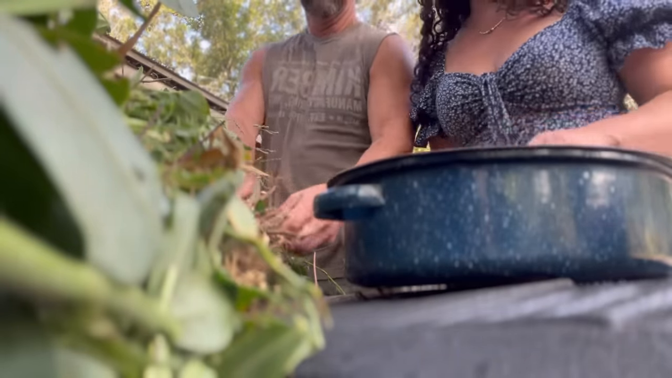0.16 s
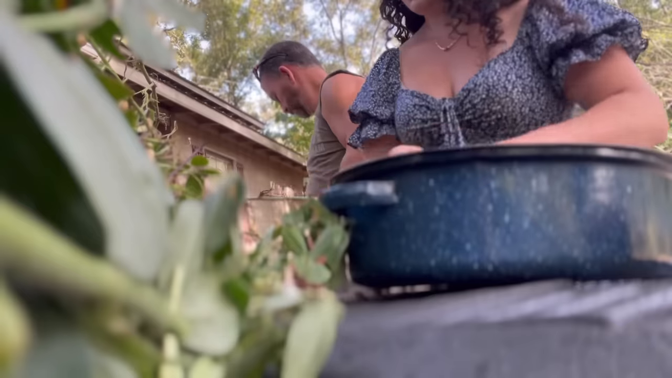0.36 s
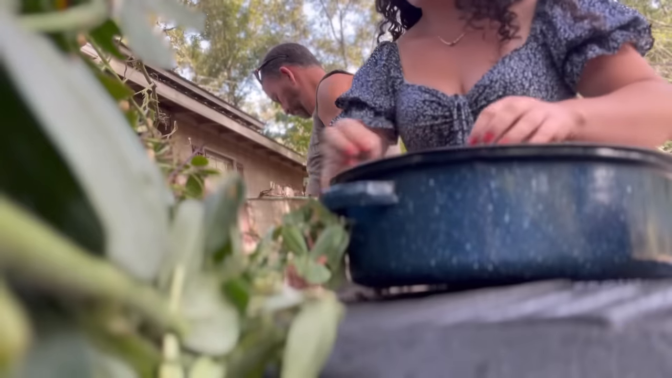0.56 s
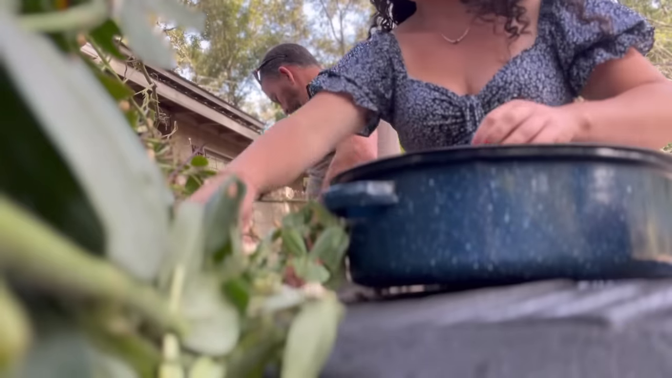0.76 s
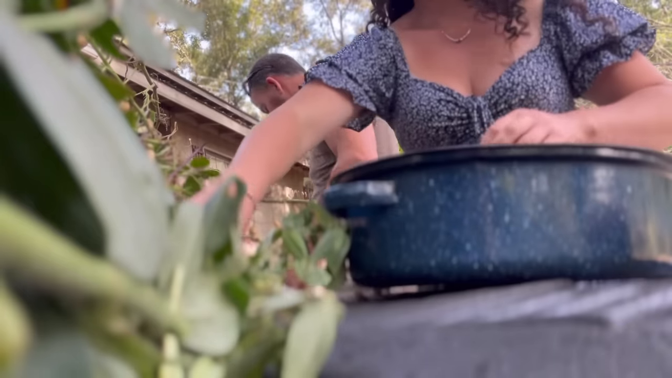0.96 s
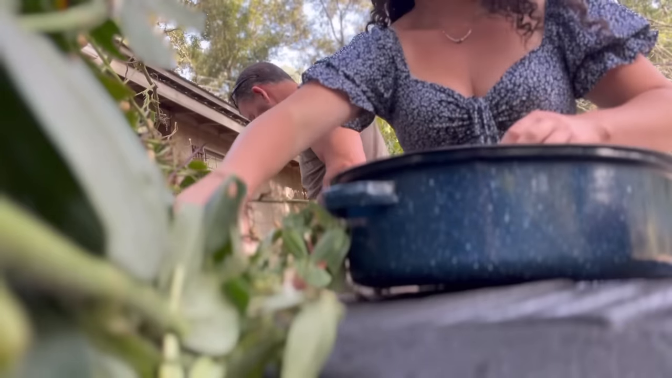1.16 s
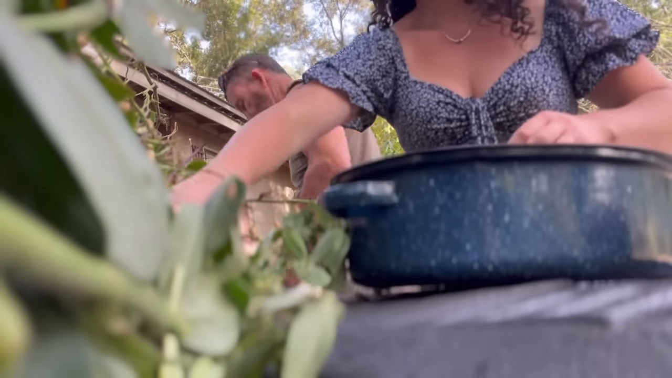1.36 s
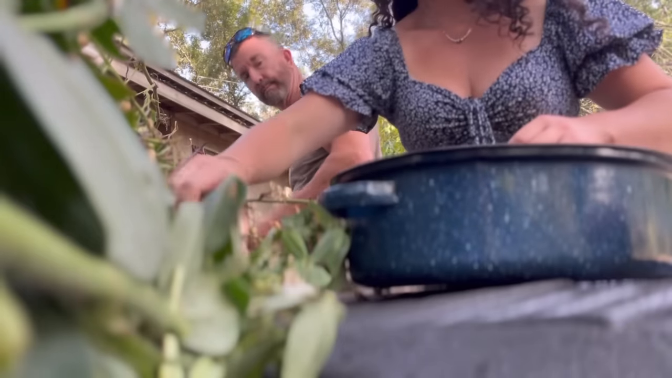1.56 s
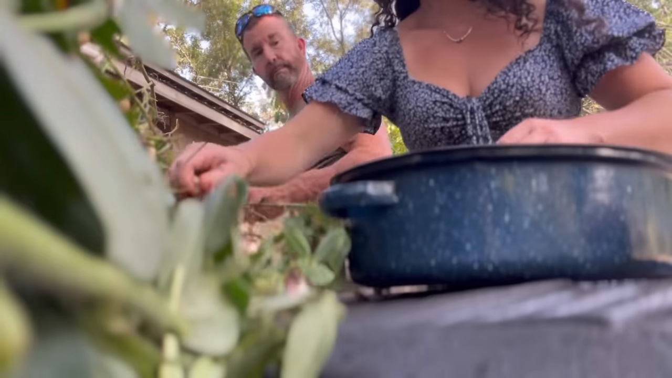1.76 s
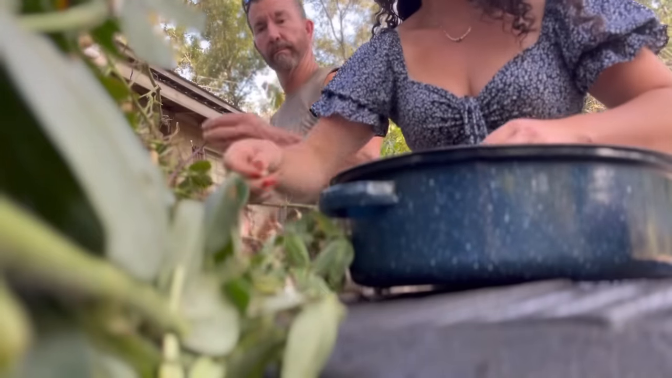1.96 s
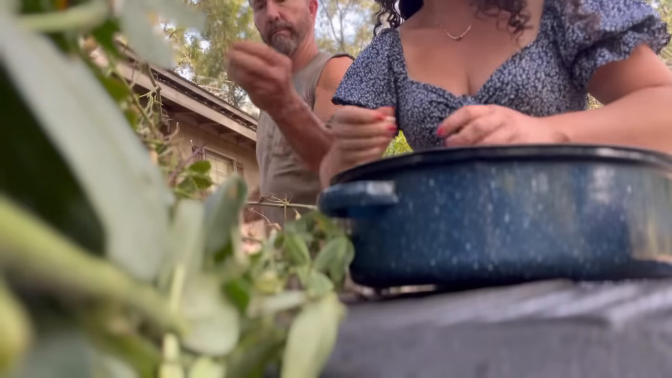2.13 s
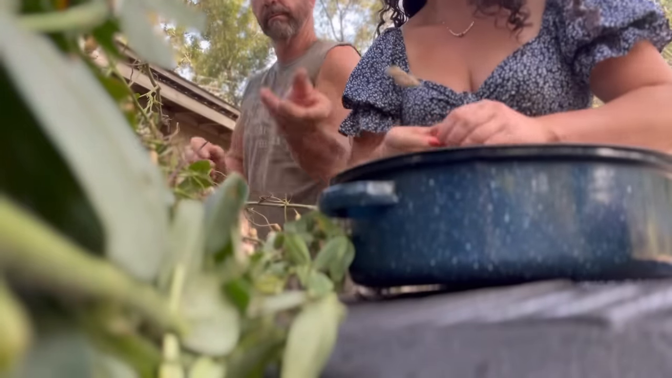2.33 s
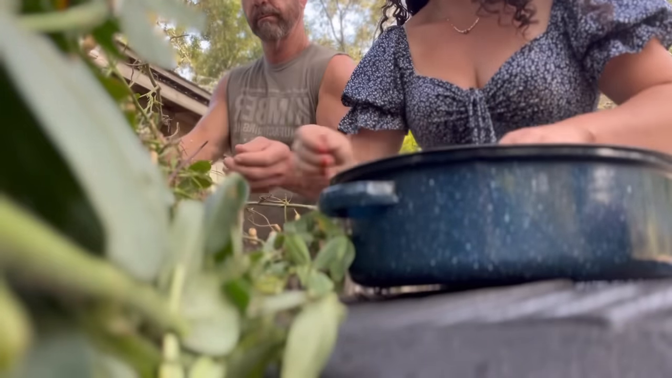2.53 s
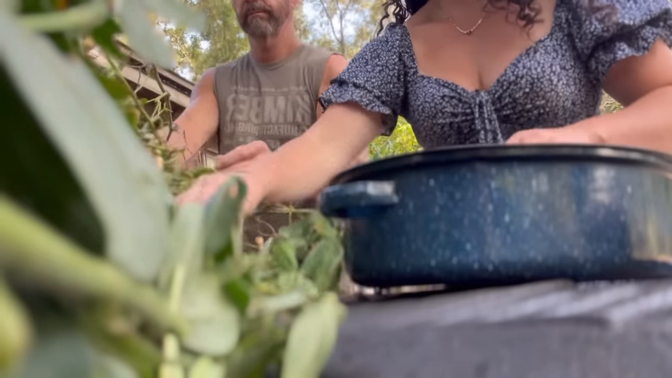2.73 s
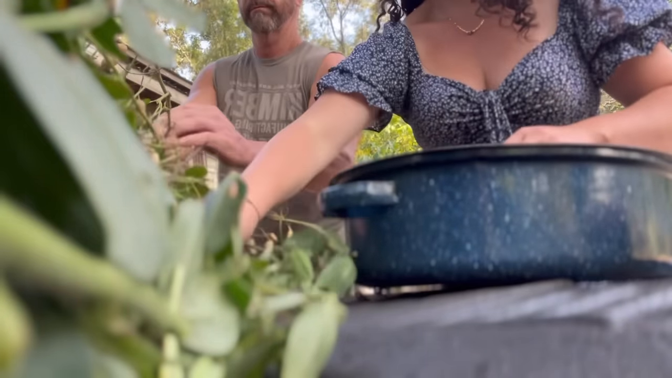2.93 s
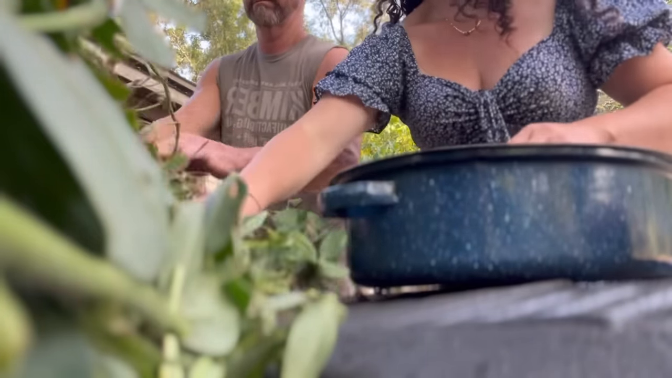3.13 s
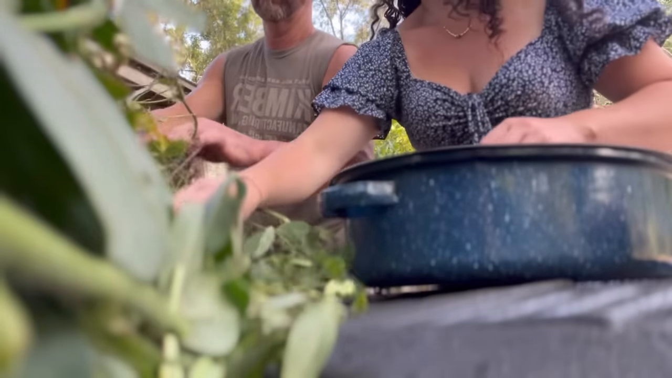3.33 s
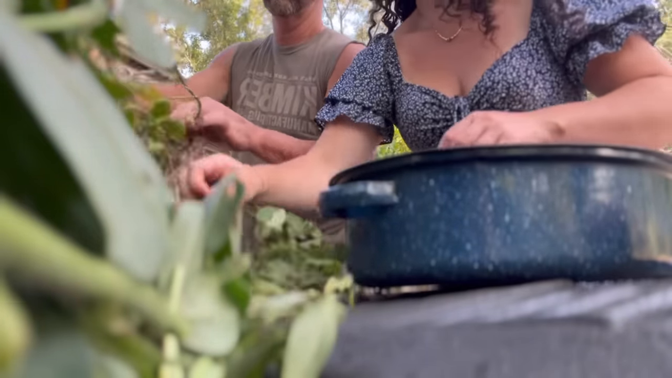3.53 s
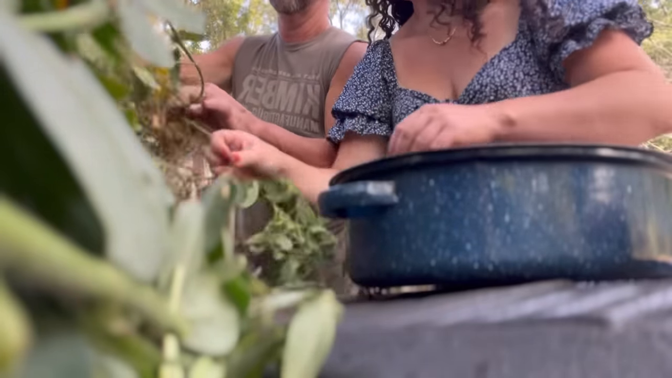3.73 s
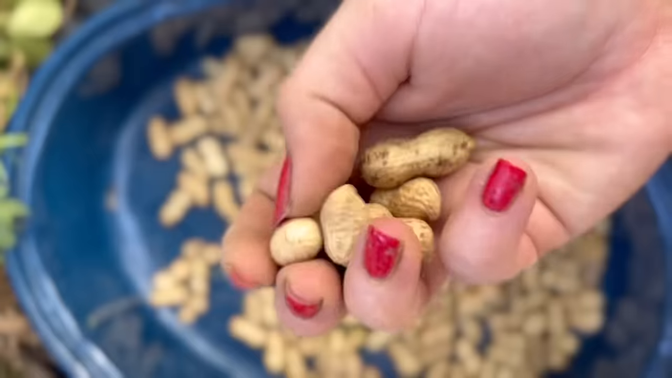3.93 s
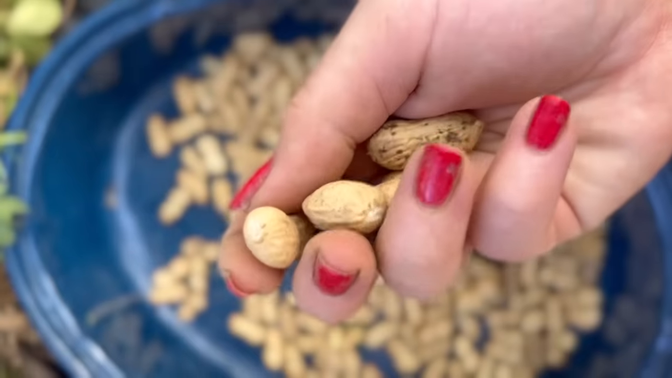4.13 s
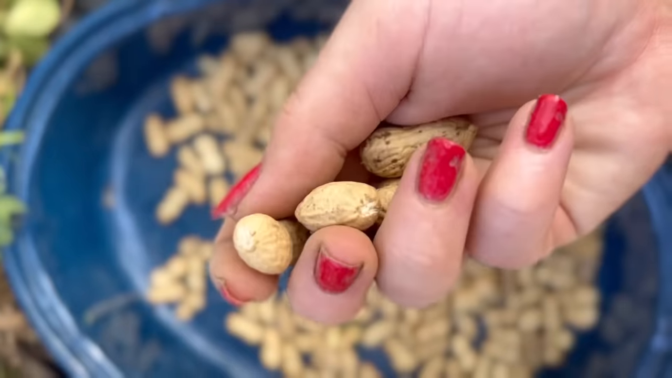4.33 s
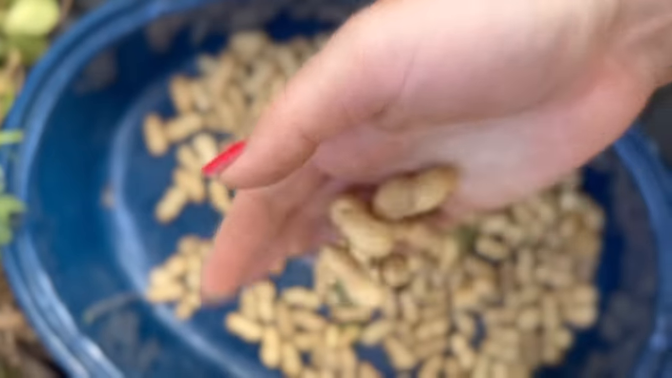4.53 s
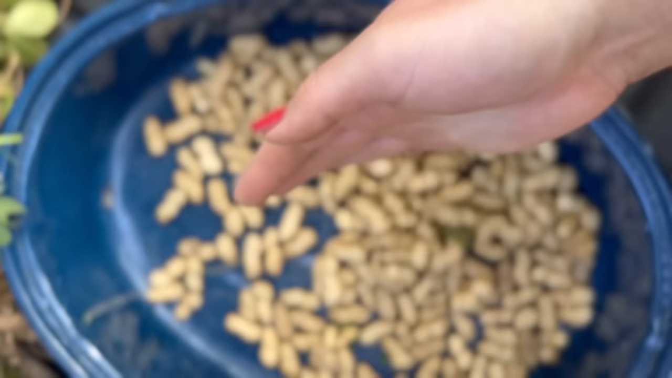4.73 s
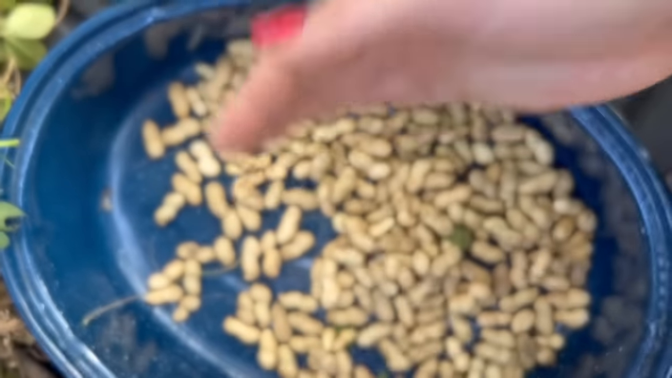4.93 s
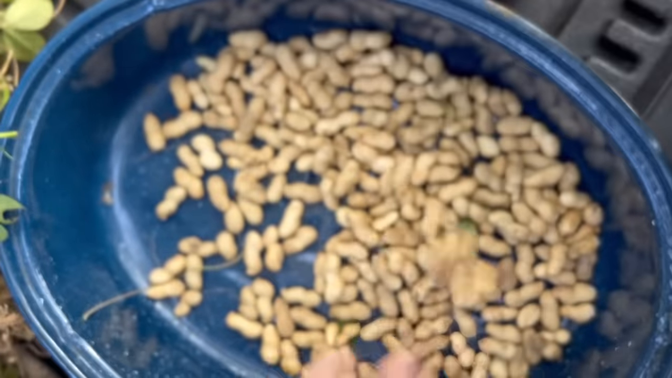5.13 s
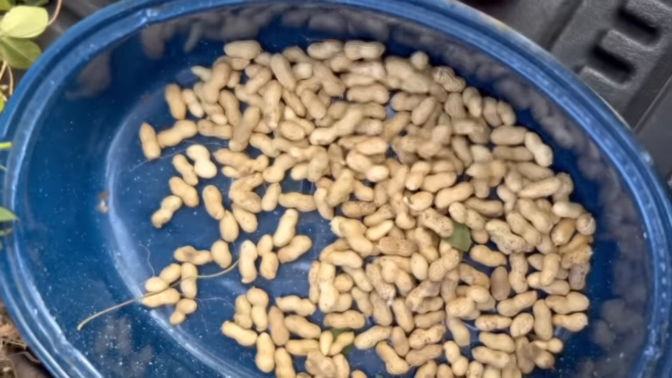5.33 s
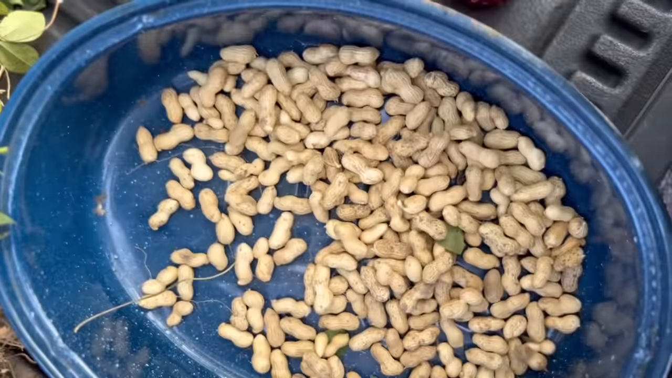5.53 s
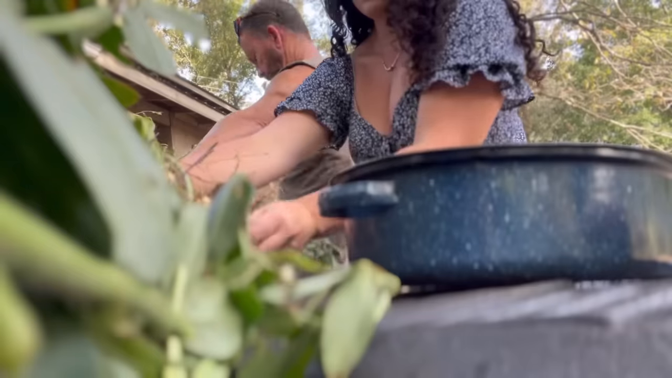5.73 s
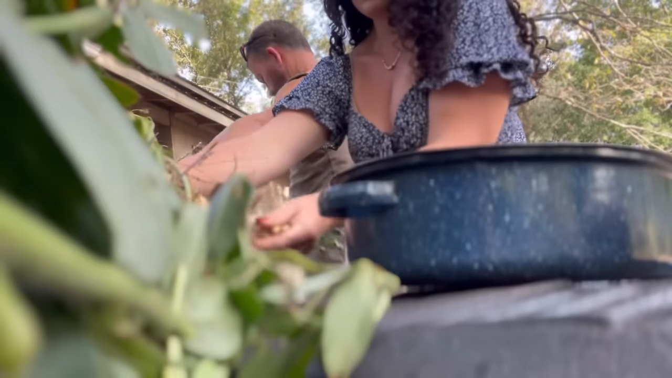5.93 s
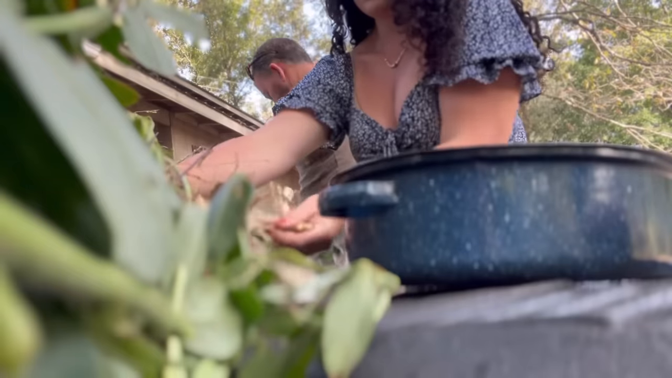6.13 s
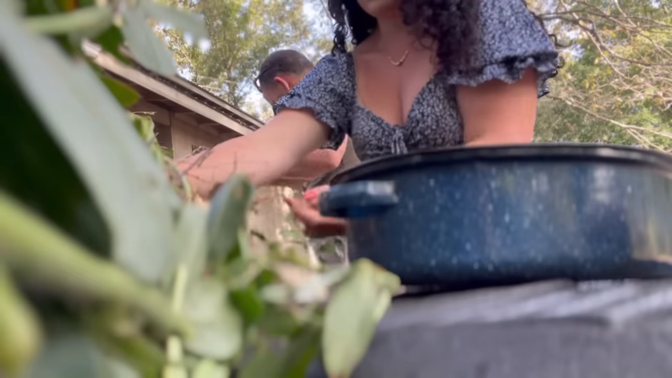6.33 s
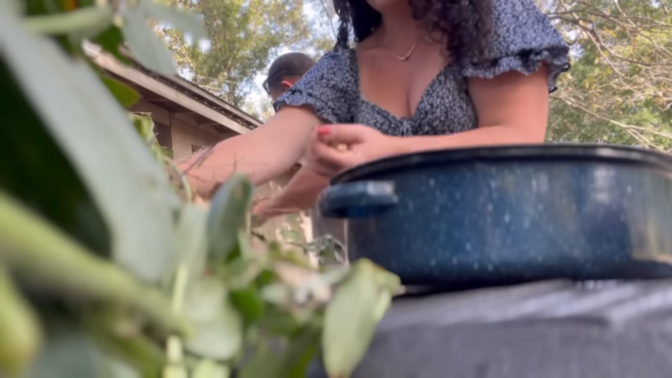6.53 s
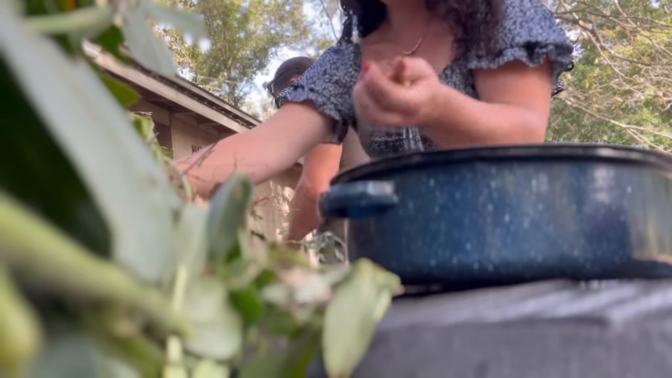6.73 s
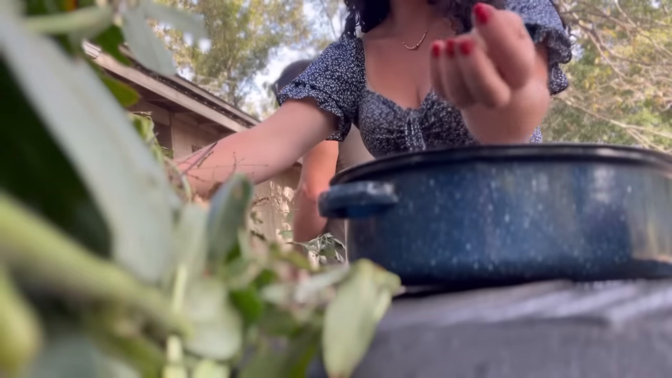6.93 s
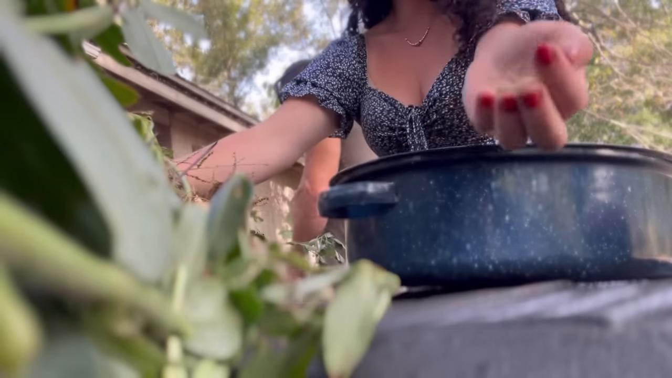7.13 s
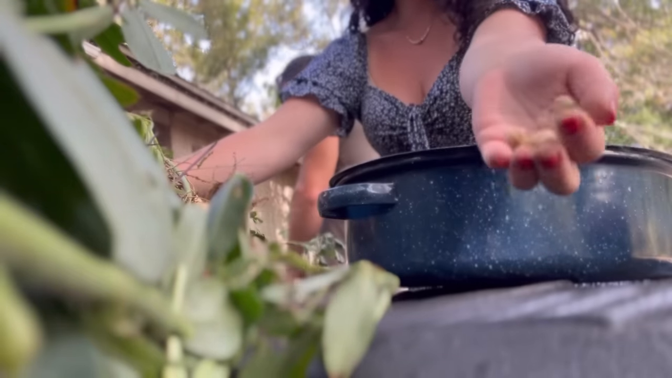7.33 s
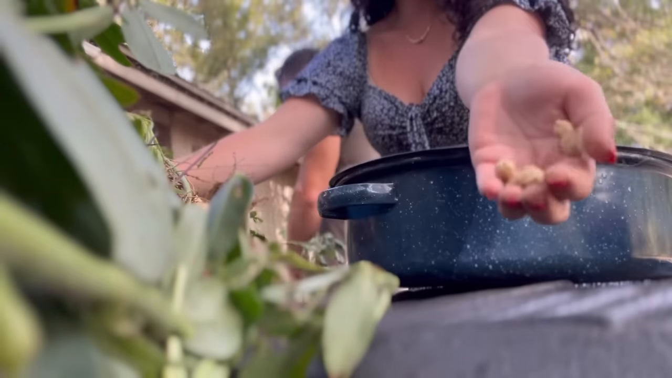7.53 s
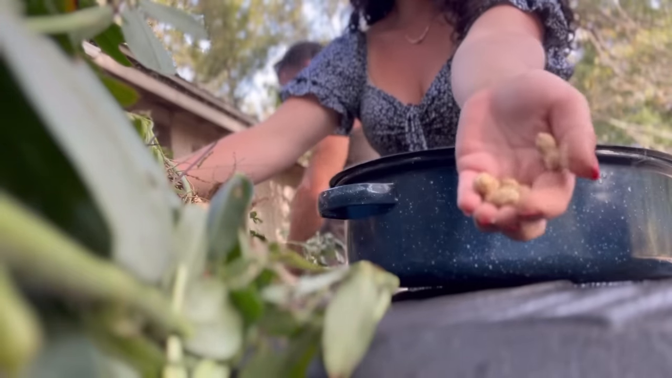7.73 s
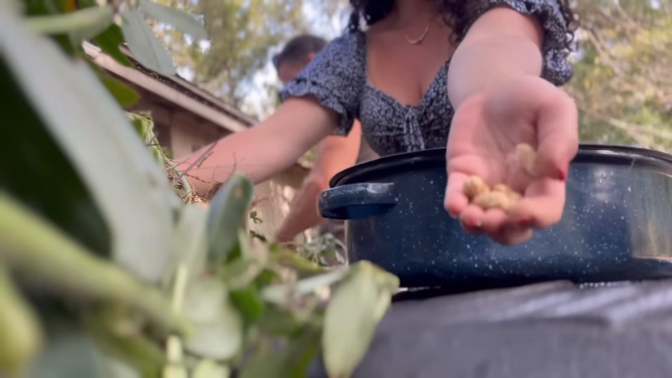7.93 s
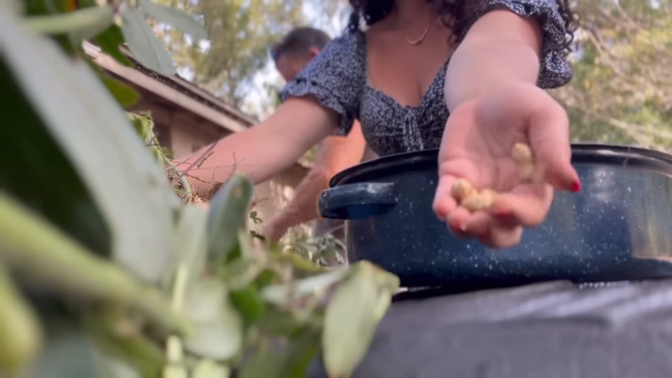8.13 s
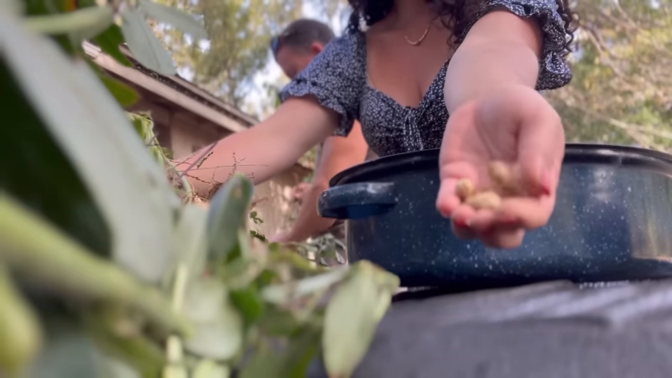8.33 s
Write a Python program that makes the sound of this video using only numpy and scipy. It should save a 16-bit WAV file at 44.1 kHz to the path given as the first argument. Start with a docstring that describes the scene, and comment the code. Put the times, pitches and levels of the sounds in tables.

```python
"""In a garden, peanuts in the shell are pulled off their plants and tossed into an enamelled steel roasting pan.
Each landing is a short hollow thud, a boom of filtered noise, a clang of many fading sines and a crackle of shells.
Bouncing nuts repeat the thud; leaves and soil rustle as grainy noise, with snaps and bumps.
A low thump opens the scene, and near the end a few nuts knock beside the pan.
Behind it all lies faint, quiet air, joined at the end by a very faint, even buzz of 30 pulses per second."""
import sys
import numpy as np
from scipy import signal
from scipy.fft import rfft, irfft, next_fast_len
from scipy.io import wavfile
from scipy.ndimage import uniform_filter1d

SR = 44100
rng = np.random.default_rng(int(sys.argv[2]) if len(sys.argv) > 2 else 0)


def wrap_up_sound(samples):
    """Save the sound to the file named by the first command line argument, as 16-bit audio."""
    columns = np.atleast_2d(samples).T
    # keep every value between -1 and 1, then stretch to whole-number steps
    tamed = np.clip(columns, -1, 1)
    steps = np.round(tamed * 32767).astype(np.int16)
    wavfile.write(sys.argv[1], SR, steps)


N = 373726
TIME = np.arange(N) / SR   # s

# quiet air: f/Hz, level per Hz/dB; and its level over time: t/s, level/dB
AIR_COLOUR = [(25, -17), (60, -1.5), (95, 4), (140, -10.5), (250, -12), (600, -23), (1500, -28),
              (3000, -35.5), (10000, -34.5), (16000, -50)]
AIR_LEVEL = [(0, -58.5), (1.5, -62), (3.8, -58), (4.0, -63.5), (5.5, -55), (6.5, -61.5), (7.2, -65),
             (8.47, -65)]
# how alike the two ears hear scattered and close sounds: f/Hz, left-right correlation
SCATTERED_LIKENESS = [(50, 0.99), (300, 0.065), (700, 0), (1400, 0.073), (2500, 0), (16000, 0)]
CLOSE_LIKENESS = [(50, 0.97), (300, 0.87), (700, 0.38), (1400, 0.32), (2500, 0), (16000, 0.024)]
# sounds already under way break off at these times: t/s
BREAK_OFFS = [3.882, 5.565]
# colours of the brushing leaves and the crumbling soil: f/Hz, level per Hz/dB
LEAF_COLOUR = [(800, -8), (1600, 1), (3000, -3), (5000, 0.5), (7500, -7), (10000, -2), (13000, -6.5),
               (15000, -19)]
SOIL_COLOUR = [(60, -17), (150, -0.5), (330, -1), (600, -1), (1100, -8.5), (2000, -19.5), (4000, -25.5)]
# a hand strips a plant or gathers its nuts: t at the strongest/s, swell time/s, leaves level/dB,
# stalks and soil level/dB
GRABS = [(0.025, 0.036, -58.5, -51.5), (0.2, 0.2, -68.5, -62.5), (0.78, 0.14, -64, -54),
         (1.0, 0.2, -63.5, -51.5), (1.249, 0.091, -62.5, -57.5), (1.62, 0.33, -64, -66),
         (1.872, 0.08, -51.5, -51), (2.95, 0.73, -59, -52.5), (3.78, 0.26, -39.5, -39),
         (3.951, 0.14, -66, -83.5), (4.25, 0.27, -67, -89), (4.563, 0.1, -62, -92.5),
         (5.6, 0.35, -51.5, -56.5), (6.08, 0.19, -53.5, -44), (6.92, 0.094, -71, -60),
         (7.11, 0.062, -71.5, -74), (7.905, 0.026, -65, -73), (8.11, 0.034, -73, -85)]
# stems and pods snapping: t/s, level/dB, f/Hz
SNAPS = [(1.236, -58, 3000), (1.296, -54, 2300), (1.862, -39.5, 7060), (3.21, -36.5, 11100),
         (3.306, -40.5, 850), (3.386, -38, 1076), (3.463, -42.5, 1890), (3.614, -34.5, 2670),
         (3.647, -34, 2160), (3.664, -33.5, 1500), (3.747, -30, 1210), (3.815, -37.5, 1101),
         (4.433, -57.5, 7490), (5.775, -50.5, 1192), (5.812, -43.5, 4500), (5.827, -38.5, 7100),
         (5.997, -65, 2800), (6.019, -44, 1480), (6.048, -41, 5070), (6.088, -44, 3200), (6.212, -45, 1500),
         (7.891, -56, 9000), (8.37, -50.5, 2693)]
# roots and clods bumping as a plant is shaken: t/s, level/dB, f/Hz, decay time/s
BUMPS = [(0.847, -38, 137, 0.027), (1.327, -52.5, 144, .02), (1.87, -48.5, 170, 0.044),
         (3.512, -44, 521, 0.0097), (3.566, -46.5, 730, 0.098), (3.645, -35.5, 610, 0.011),
         (3.663, -37.5, 554, 0.028), (3.748, -31, 800, 0.0073), (3.76, -33.5, 460, 0.014),
         (3.791, -32, 540, 0.014), (5.957, -49, 670, 0.023), (5.958, -46, 270, 0.043),
         (6.02, -51, 520, 0.007), (6.064, -38, 262, 0.012), (6.092, -46, 296, 0.018),
         (6.159, -43, 690, 0.016), (6.212, -46, 715, 0.0099), (6.244, -50.5, 277, 0.026),
         (6.46, -65.5, 674, .015), (6.497, -56, 724, 0.048), (6.61, -35.5, 220, 0.034),
         (6.74, -50, 229, .04)]
# a low opening thump, then knocks beside the pan: t/s, body level/dB, brightness/dB per octave,
# left-right/dB, thud f/Hz, thud level/dB
KNOCKS = [(0.002, -42.5, -12.5, 3.5, 330, -47), (6.538, -18.5, -3, 2.5, 724, -16.5),
          (6.5805, -27, -4, 0, 296, -24), (6.593, -36.5, -7.5, 5, 526, -18.5),
          (6.705, -32, -3, 2.5, 621, -25), (6.733, -48, -8, 1, 850, -35)]
# the body of a knock: f/Hz, level per Hz/dB, time to fall 60 dB/s
KNOCK_BODY = [(50.2, -37.5, .6), (112, -13, 0.86), (200, -2.5, 0.4), (386, 0, 0.22), (630, 1.5, 0.24),
              (1183, 2.5, 0.19), (1760, -4, 0.166), (2427, -0.5, 0.15), (3197, -6.5, 0.13),
              (4800, -25, 0.12), (9000, -46, 0.06), (16060, -54, 0.1)]
# handfuls tossed in: t/s, thud left-right/dB, thud's phase lead at the left ear/rad,
# boom under a full-scale thud/dB, shell crackle relative to the blow/dB,
# extra damping of the ring/dB per s, rim's afterglow relative to the clang/dB
HANDFULS = [(0.3, -2, -0.5, -27, -26, 7.5, -24.5), (2.4, -3, -0.4, -23, -24, -2, -23.5),
            (4.6, -0.5, 0.2, -25, -11, 36.5, -23), (5.1, 1.5, 0.3, -21, -11, 6.5, -20.5)]
# nuts landing in the pan: t/s, thud f/Hz, thud level/dB, clang level/dB,
# clang brightness/dB per octave, length of the first hop/s (0 if the nut lies still)
LANDINGS = [ (0.3577, 625, -6, -33.5, 1, 0.011), (0.446, 638, -27.5, -44, -8.5, 0.0025),
            (0.5354, 650, -9, -20.5, -2.5, 0.0042), (0.5372, 1095, -9, -34, -4.5, 0.00032),
            (0.558, 532, -10.5, -35, -4, 0.00056), (0.5814, 600, -21, -37, -5.5, 0.025),
            (0.658, 552, -12.5, -34, -2, 0.0037), (0.719, 598.5, -14, -46.5, 2, 0.0024),
            (0.757, 657, -27.5, -46, -12, 0.0017), (0.834, 720, -35, -58, 3, 0.0056),
            (0.914, 463, -36, -62, -4, 0), (1.022, 683, -34.5, -52.5, -10, 0),
            (2.436, 519, -7.5, -21.5, -1.5, 0.013), (2.452, 668, -25.5, -14.5, 0, 0.003),
            (2.5545, 577, -16.5, -25.5, -8, 0.0041), (2.591, 525, -2.5, -18, -6, 0.01),
            (2.632, 580, -10, -19, -1, 0.0071), (2.7304, 670, -19, -33, -12, 0.011),
            (2.785, 598.6, -29.5, -53, 1, 0.011), (3.211, 745, -34, -46, -20, 0),
            (3.3053, 610, -41.5, -46.5, -9.5, 0), (3.399, 735.2, -34, -40, -18, 0.0029),
            (4.6264, 415, -6.5, -27.5, -3.5, 0.00058), (4.642, 430, -6, -22, -4, 0.0077),
            (4.663, 432, -8, -25.5, -2.5, 0.0086), (4.7842, 579, -22, -47, -6.5, 0),
            (4.846, 600.3, -42.5, -48.5, -9, 0), (4.985, 850, -55, -69, -5.5, 0),
            (5.1423, 927, -13.5, -19, -7.5, 0.023), (5.145, 530, -4, -35.5, 0, 0),
            (5.159, 600.5, -9, -23.5, -0.5, 0.015), (5.248, 600, -51, -33, 1, 0),
            (5.262, 596, -64, -34.5, 1.5, 0), (5.279, 448, -38, -33, -4, 0.0006),
            (5.312, 497, -40, -39, -8, 0), (5.370, 592, -25.5, -36.5, -11, 0),
            (5.516, 648, -45, -65, -1, 0.052)]
# side modes of the pan bottom: f relative to the thud's, level/dB
BOTTOM_MODES = [(.64, -18), (1.35, -14.5), (1.797, -14), (2.348, -16.5)]
# the pan bottom booming on its stand, and the dry shells crackling:
# f/Hz, level per Hz/dB, time to fall 60 dB/s
BOOM_BODY = [(50, -19, 0.44), (92, -10.5, 0.92), (167, -2, 0.38), (189, 2, .3), (270, -4, 0.24),
             (355, -3, 0.24), (487, 5.5, 0.24), (690, -4.5, 0.27), (1300, -12, .12), (2500, -41, .1)]
SHELL_BODY = [(3000, -10, .15), (4870, 3.5, 0.077), (9100, 1, 0.081), (12100, -13, 0.3), (16000, -10, .13)]
# the pan's clear modes: f/Hz, level/dB, time to fall 60 dB/s
CLEAR_MODES = [(933, -8, 0.22), (1031, -5, 0.25), (1055, -6, 0.25), (1105, -17, 1.2), (1254, -14, 0.9),
               (1346, -16, 1.3), (1416, -11, 0.8), (1485, 0, 0.4), (1516, -14, 0.9), (1550, -9, 0.43),
               (1684, -9, 0.42), (1805, -7, 0.35), (1864, -3.5, 0.33), (2013, -18, 0.9), (2117, -7, 0.45),
               (2183, -11.5, 0.55), (2234, -6, 0.35), (2288, -11, 0.6), (2367, -10, 0.4), (2593, -5, 0.33),
               (2763, 2.5, 0.26), (2941, -10, 0.38), (3022, -6, 0.27), (3150, -10, 0.35), (3334, -11, 0.3),
               (3410, -9, 0.45), (3577, -10, 0.3), (3942, -4, 0.24), (4394, -6, 0.24), (5206, -11, 0.23)]
# the crowd of weaker modes between them: f/Hz, level/dB
CROWD_LEVEL = [(700, -4), (1200, 0), (1800, -0.5), (2500, 2.5), (3400, 0.5), (4300, -7.5), (6000, -13.5),
               (7500, -36)]
# how long the crowd rings: f/Hz, time to fall 60 dB/s
CROWD_RING = [(700, 0.1), (1500, 0.2), (3300, 0.16), (7500, 0.33)]
# faint, long-lived modes of the rim: f/Hz, level/dB
RIM_LEVEL = [(1000, -2), (1400, -0.5), (2200, 0), (3600, -10)]
# the wall beams its treble to the left: f/Hz, left-right/dB
WALL_BEAM = [(1000, 0), (2500, 1), (4500, 4.5), (7500, 2)]
# after some landings single tones ring on: t/s, f/Hz, level/dB, time to fall 60 dB/s
SINGING_MODES = [(0.358, 3418, -40, 0.2), (0.358, 3483, -54, 0.7), (0.358, 2525, -37, 0.22),
                 (0.358, 1497, -46, 0.8), (0.536, 1416, -37, 1.0), (0.536, 1518, -42, 1.0),
                 (0.536, 2180, -51, 1.3), (0.536, 2385, -52, 1.0), (0.536, 3415, -33, .3),
                 (0.536, 1401, -45, 1.2), (0.536, 1380, -49, 1.3), (0.536, 1110, -57, 2.0),
                 (0.536, 2135, -53, 1.2), (0.536, 1771, -56, 1.3), (0.658, 3483, -46, .3),
                 (2.453, 3334, -35, 0.45), (2.453, 1485, -31, 0.42), (2.593, 1173, -42.5, 3.2),
                 (2.593, 1185, -44.5, 3.2), (2.593, 1206, -46.5, 2.6), (2.593, 1161, -49, 3.0),
                 (2.593, 1104, -50, 3.2), (2.593, 1108, -49, 3.2), (2.593, 1053, -54, 2.5),
                 (2.632, 1378, -48, 1.4), (2.632, 1401, -48, 1.2), (2.632, 1417, -43, 0.9),
                 (2.632, 2186, -52, 1.5), (2.632, 2288, -41.5, 1.1), (2.632, 3334, -44, 0.85),
                 (4.661, 1346, -58, 2.2), (4.661, 1254, -62, 1.6), (4.661, 2480, -51, 0.5),
                 (4.661, 3480, -50, 0.45), (5.158, 1125, -42, 4.0), (5.158, 1254, -47, 1.7),
                 (5.158, 1303, -48, 1.8), (5.251, 2277, -49, 1.4), (5.251, 2406, -53, 1.2),
                 (5.251, 3397, -53, 0.9), (5.251, 4180, -47, 0.3), (5.158, 1071, -51, 2.2),
                 (5.158, 1206, -52, 1.3), (5.251, 2013, -54, 1.4), (5.251, 2135, -55, 0.9),
                 (5.251, 2250, -52, 0.8), (5.251, 2470, -54, 0.8), (5.251, 3310, -56, 0.7),
                 (5.251, 3475, -58, 0.7), (5.262, 5206, -48, 0.25)]
# a nut rocks or rolls and keeps the bottom humming: t/s, f/Hz, level/dB, decay time/s
ROLLS = [(0.826, 714, -40, 0.011), (0.843, 458, -35, 0.013), (0.913, 500, -31.5, 0.02),
         (1.023, 508, -36, 0.014), (1.163, 1043, -49, 0.011), (1.207, 974, -52, 0.0091),
         (1.298, 577, -50, .014), (2.786, 543, -32.5, 0.016), (3.211, 817.4, -32, 0.008),
         (3.4, 754, -27, 0.0069), (4.645, 300, -18, 0.019), (5.15, 333, -12.5, 0.012)]
# short hollow thuds without a clang, some strong, some faint: t/s, f/Hz, level/dB
BARE_THUDS = [(0.406, 620, -31), (0.602, 620, -36), (4.629, 900, -16), (4.644, 1000, -18),
              (4.653, 620, -18), (4.690, 560.4, -22), (4.701, 477, -27), (4.719, 656, -29),
              (4.749, 681, -37), (4.800, 554, -38), (4.812, 750, -39), (4.8205, 596, -29.5),
              (4.834, 590, -34), (4.862, 450, -38.5), (5.192, 490, -31), (5.283, 1300, -39),
              (5.371, 1260, -29.5), (5.553, 708, -47)]
# dry shells skitter over the wall and the heap: t/s, length/s, level/dB, centre f/Hz
SKITTERS = [(4.623, 0.053, -48, 9000), (4.695, 0.2, -56, 8440), (5.179, 0.082, -53, 8400),
            (5.258, 0.12, -41, 4790), (5.257, 0.12, -58, 9000)]

BUZZ_S, BUZZ_TOP_HZ = 7.32, 1540
LET_GO = 0.82   # a rustle dies away in this share of its swell time
STIR_LEAVES_DB, STIR_SOIL_DB = -78.5, -76.5   # faint stirring of the plants between grabs
HOPS, HOP_LOSS_DB, HOP_SHRINK = 3, 8.5, .9   # each hop is weaker and shorter than the last
THUD_LOW_CUT = 0.46   # below this share of its pitch the bottom hardly radiates
SCATTER_DB = 0.8   # left-right spread of the landings and hops
RIM_T60_S, RIM_DAMPED = 1.0, 0.57   # ring time; share of the extra damping that reaches the rim
BOOM_FOLLOWS = .5   # share of the thud's level that the boom follows
HEAP_HZ, HEAP_DB_PER_OCTAVE = 565, 15   # where the heap loads the bottom, the thud is lower and booms more
SHELL_THUD_SHARE = 0.21   # the crackle's level lies between the clang's and the thud's
WALL_LEFT_DB, BOOM_LEFT_DB = 1.04, 2   # both radiate more to the left
SKITTER_FADE_DB, SKITTER_SPREAD_DB = 18, 11   # loss over one run; range of the contacts' strengths
CUTOFF_HZ = 15800


def from_db(db):
    """Decibels to gain."""
    return 10 ** (np.asarray(db) / 20)


def rms_one(x):
    """Scale to an rms (average strength) of one."""
    return x / np.sqrt(np.mean(x ** 2) + 1e-20)


def at_hz(points, hz, axis=1):
    """Read one column of a spectrum table on a log-frequency axis."""
    points = np.array(points)
    return np.interp(np.log(hz), np.log(points[:, 0]), points[:, axis])


def swell(size, rise_s):
    """Vibration takes a moment to spread over a body."""
    return 1 - np.exp(-TIME[:size] / rise_s)


def fall(t60_s, t):
    """A ring loses the same share of its strength each moment, 60 dB in t60_s."""
    return np.exp(-np.log(1000) * t / t60_s)


def add(out, s, sound, balance_db=0):
    """Mix a sound in at s seconds; it ends at the next break-off."""
    start = int(s * SR)
    later_breaks = [int(b * SR) for b in BREAK_OFFS if b > s]
    stop = min([N, start + sound.shape[-1]] + later_breaks)
    left_right = from_db([[balance_db / 2], [-balance_db / 2]])
    out[:, start:stop] += sound[..., :stop - start] * left_right


def stereo_spectrum(spectrum, likeness, size):
    """Random stereo spectrum with the given colour and the ears' likeness: (Hz, bins)."""
    hz = np.maximum(np.arange(size // 2 + 1) * SR / size, 1)
    mid, side = rfft(rng.standard_normal((2, size)))
    alike = np.clip(at_hz(likeness, hz), -1, 1)
    ears = np.sqrt(1 + alike) * mid + np.sqrt(1 - alike) * side * [[1], [-1]]
    # power rolls off beyond both ends of the table
    ends = 1 / (1 + (spectrum[0][0] / hz) ** 4) / (1 + (hz / spectrum[-1][0]) ** 8)
    return hz, from_db(at_hz(spectrum, hz)) * np.sqrt(ends) * ears


def noise(spectrum):
    """Steady, diffuse stereo noise, rms 1."""
    _, bins = stereo_spectrum(spectrum, SCATTERED_LIKENESS, 2 * next_fast_len(N // 2 + 1))
    return rms_one(irfft(bins)[:, :N])


def grains(per_s, life_s, spread_db):
    """Envelope of many tiny contacts of uneven size, each dying quickly; rms 1."""
    sizes = from_db(spread_db * np.minimum(rng.exponential(1, N), 4))
    hits = (rng.random(N) < per_s / SR) * sizes ** 2
    power = signal.lfilter([1], [1, -np.exp(-2 / (life_s * SR))], hits + 1e-18)
    return rms_one(np.sqrt(power))


def pop(hz, decay_s, width, side_db):
    """A short burst in a band from hz / width to hz * width; rms about 1 at the start."""
    t = TIME[:int(np.clip(7 * decay_s, .01, .125) * SR)]
    width = max(width, 1.1)
    edges = np.clip([hz / width, hz * width], 50, .45 * SR)
    push = rng.standard_normal((2, len(t))) * np.exp(-t / decay_s)
    band = signal.sosfilt(signal.butter(2, edges, "band", fs=SR, output="sos"), push)
    mid, side = [v * np.sqrt(decay_s * SR / 2 / np.sum(v ** 2)) for v in band]
    return mid + from_db(side_db) * side * [[1], [-1]]


def burst(body, size, tilt_db=0):
    """A struck, damped body: lows build up later, each band dies at its own rate; rms about 1 at the start."""
    hz, bins = stereo_spectrum(body, CLOSE_LIKENESS, size)
    tilted = bins * from_db(tilt_db * np.log2(hz))
    centres, _, t60 = np.transpose(body)
    # overlapping bands, one around each row of the table
    shares = np.array([np.interp(np.log(hz), np.log(centres), row) for row in np.eye(len(body))])
    bands = irfft(np.complex64(shares[:, None] * tilted))
    shape = fall(t60[:, None, None], TIME[:size]) * swell(size, 1 / centres[:, None, None])
    return (bands * shape).sum(0) / bands.sum(0).std()


def thud(hz, rise_s, sharpness, tail_db, tail_s, lead_cycles, ears_apart, left_lead):
    """A struck, damped surface swings a few cycles: a short push, a weaker tail and side modes."""
    t = TIME[:SR // 10]
    spread = swell(len(t), rise_s)
    push = (t / rise_s * np.exp(1 - t / rise_s)) ** sharpness
    tail = from_db(tail_db) * spread * np.exp(-t / tail_s)
    turn = 2 * np.pi * (hz * t + lead_cycles * spread)   # short bending waves arrive first
    turn = turn + left_lead * np.array([[.5], [-.5]])
    push_phase = ears_apart * rng.standard_normal((2, 1))
    tail_phase = rng.standard_normal() + .5 * rng.standard_normal((2, 1))
    out = push * np.sin(turn + push_phase) + tail * np.sin(turn + tail_phase)
    for ratio, level_db in BOTTOM_MODES:
        phase = rng.uniform(0, 2 * np.pi) + 4 * ears_apart * rng.standard_normal((2, 1))
        out += from_db(level_db) * (push + tail) * np.sin(ratio * turn + phase)
    return signal.sosfilt(signal.butter(2, hz * THUD_LOW_CUT, "high", fs=SR, output="sos"), out)


def quiet_air():
    """Quiet air: steady noise, mostly low, whose level drifts."""
    return from_db(np.interp(TIME, *np.transpose(AIR_LEVEL))) * noise(AIR_COLOUR)


def buzz(start_s, level_db, low_hz):
    """A very faint, even buzz fades in near the end: a sharp pulse, a weak one, and hiss between."""
    cycles = 30 * (TIME - start_s)   # 30 per second
    strong = np.exp(-(cycles % 1) / .06)
    weak = .3 * np.exp(-((cycles + .55) % 1) / .06)
    beat = strong + weak + .11
    band = signal.sosfilt(signal.butter(16, BUZZ_TOP_HZ, fs=SR, output="sos"), beat * rng.standard_normal(N))
    band = signal.sosfilt(signal.butter(2, low_hz, "high", fs=SR, output="sos"), band)
    return from_db(level_db) * rms_one(band) * np.clip((TIME - start_s) / 0.13, 0, 1)


def rustle_gains():
    """Each grab swells and dies away, within its own stretch of the scene: gains of (leaves, soil)."""
    stretch = np.searchsorted(BREAK_OFFS, TIME)
    # the faint stirring is silent in the middle stretch
    power = from_db([[STIR_LEAVES_DB], [STIR_SOIL_DB]]) ** 2 * (stretch != 1)
    for s, swell_s, leaves_db, soil_db in GRABS:
        shape = np.exp(np.minimum(TIME - s, (s - TIME) / LET_GO) / swell_s)
        shape = shape * (stretch == np.searchsorted(BREAK_OFFS, s))
        power += (from_db([[leaves_db], [soil_db]]) * shape) ** 2
    return np.sqrt(power)


def breaks(rustle, per_s, above_db, spread_db, low_hz, high_hz):
    """Small things break at random, as loud as the rustle around them allows: rows (s, dB, pitch Hz)."""
    when, size, pitch = rng.random((int(per_s * N / SR), 3)).T
    rustle_db = 20 * np.log10(rustle[(when * N).astype(int)])
    level_db = rustle_db + above_db + spread_db * (2 * size - 1)
    return list(zip(when * N / SR, level_db, low_hz * (high_hz / low_hz) ** pitch))


def plants():
    """Leaves brush, soil crumbles off the roots, stems snap and clods bump: grainy noise and short bursts."""
    leaves, soil = rustle_gains()
    out = leaves * noise(LEAF_COLOUR) * grains(per_s=740, life_s=0.015, spread_db=2.4)
    out += soil * noise(SOIL_COLOUR) * grains(per_s=240, life_s=0.014, spread_db=2.5)
    twigs = breaks(leaves, per_s=12, above_db=0.0, spread_db=4.0, low_hz=1800, high_hz=9000)
    for s, level_db, hz in SNAPS + twigs:
        add(out, s, from_db(level_db) * pop(hz, decay_s=0.0018, width=1.9, side_db=-0.5))
    for s, level_db, hz, decay_s in BUMPS:
        add(out, s, from_db(level_db) * pop(hz, decay_s, width=1.35, side_db=-6.5))
    return out


def knocks():
    """Knocks without metal ring: a hollow thud, a low rumble, an uneven tail."""
    out = np.zeros((2, N))
    for s, level_db, tilt_db, balance_db, hz, thud_db in KNOCKS:
        body = burst(KNOCK_BODY, size=16384, tilt_db=tilt_db)
        size = body.shape[1]
        crack = 1 + from_db(12.0) * np.exp(-TIME[:size] / 0.0057)
        unevenness = rms_one(uniform_filter1d(rng.standard_normal(size), size=200))
        rattle = from_db(1.5 * unevenness * swell(size, rise_s=0.015))
        add(out, s, from_db(level_db - 2.5) * crack * rattle * body, balance_db)
        hollow = thud(hz, rise_s=1.1 / hz, sharpness=4.0, tail_db=-8.5, tail_s=0.017,
                      lead_cycles=0.08, ears_apart=1 / 5, left_lead=0.75)
        add(out, s, from_db(thud_db) * hollow, balance_db)
    return out


def skitters():
    """Runs of tiny, bright contacts at uneven times, dying away; their pitches spread over an octave."""
    out = np.zeros((2, N))
    for s, length_s, level_db, hz in SKITTERS:
        octaves = rng.uniform(-.5, .5, size=12)
        ticks = [pop(hz * 2 ** octave, decay_s=0.002, width=1.2, side_db=-3) for octave in octaves]
        for k, (when, size) in enumerate(rng.random(size=(48, 2))):
            contact_db = level_db - SKITTER_FADE_DB * when + SKITTER_SPREAD_DB * (size - .5)
            add(out, s + when * length_s, from_db(contact_db) * ticks[k % len(ticks)])
    return out


def rolls(rise_s, wobble, rough):
    """A lumpy shell rolling over the bottom keeps it swinging at an unsteady pitch and strength."""
    out, t = np.zeros((2, N)), TIME[:SR // 6]
    for s, hz, level_db, decay_s in ROLLS:
        bend, press = rms_one(uniform_filter1d(rng.standard_normal((2, len(t))), size=180))
        turn = 2 * np.pi * hz * t + wobble * bend
        envelope = swell(len(t), rise_s) * np.exp(-t / decay_s) * (1 + rough * press)
        add(out, s, from_db(level_db) * envelope * np.sin(turn))
    return out


def singing(apart, waver):
    """Single tones of the wall ring on, wavering unevenly, each with its own phase at each ear."""
    out, t = np.zeros((2, N)), TIME[:2 * SR]
    for s, hz, level_db, t60 in SINGING_MODES:
        envelope = from_db(level_db) * fall(t60, t) * swell(len(t), rise_s=0.0053)
        envelope *= 1 + waver * np.interp(t, np.linspace(0, 2, 100), rng.standard_normal(100))
        phase = apart * rng.uniform(-0.65, 1, (2, 1))
        add(out, s, envelope * np.sin(np.float32(2 * np.pi * hz * t + phase)))
    return out


def handful_at(s):
    """The row of the latest handful tossed by s seconds."""
    return [handful for handful in HANDFULS if handful[0] <= s][-1]


def touches(s, level_db, hop_s):
    """A nut's landing and its dying run of hops: rows (s, dB)."""
    rows = [(s, level_db)]
    for k in range(HOPS if hop_s > 0 else 0):
        s, level_db = s + hop_s * HOP_SHRINK ** k, level_db - HOP_LOSS_DB
        rows.append((s, level_db))
    return rows


def thuds():
    """The bottom, damped by the nuts lying on it, swings briefly: landings, hops and thuds without a clang."""
    out = np.zeros((2, N))
    for s, hz, thud_db, _, _, hop_s in LANDINGS:
        _, side_db, lead, *_ = handful_at(s)
        for touch_s, touch_db in touches(s, thud_db, hop_s):
            blow = thud(hz, rise_s=1.15 / hz, sharpness=1.8, tail_db=-14.5, tail_s=0.01,
                        lead_cycles=0.055, ears_apart=1 / 8, left_lead=lead)
            touch_side_db = side_db + SCATTER_DB * rng.standard_normal()
            add(out, touch_s, from_db(touch_db) * blow, touch_side_db)
    for s, hz, level_db in BARE_THUDS:
        _, side_db, lead, *_ = handful_at(s)
        bare = thud(hz, rise_s=1.0 / hz, sharpness=2.8, tail_db=-21, tail_s=0.008,
                    lead_cycles=0.2, ears_apart=1 / 8, left_lead=lead)
        add(out, s, from_db(level_db) * bare, side_db)
    return out


def booms_and_crackles():
    """Each landing makes the bottom boom on its stand and the dry shells click and shift."""
    booms, shells = np.zeros((2, 2, N))
    # ten boom and crackle noise bursts, used in turn
    bursts = [(burst(BOOM_BODY, size=16384), burst(SHELL_BODY, size=8192)) for _ in range(10)]
    for k, (s, hz, thud_db, clang_db, tilt_db, _) in enumerate(LANDINGS):
        boom, crackle = bursts[k % len(bursts)]
        _, _, _, weight_db, shell_db, _, _ = handful_at(s)
        boom_db = weight_db + BOOM_FOLLOWS * thud_db + HEAP_DB_PER_OCTAVE * np.log2(HEAP_HZ / hz)
        add(booms, s, from_db(boom_db) * boom, BOOM_LEFT_DB)
        # the landing shell clicks, then its neighbours shift
        tick = 1 + from_db(4) * np.exp(-TIME[:crackle.shape[1]] / 0.0005)
        # a sharper contact crackles more
        blow_db = clang_db + SHELL_THUD_SHARE * (thud_db - clang_db) + 2.6 * tilt_db
        add(shells, s, from_db(blow_db + shell_db) * tick * crackle)
    return booms + shells * grains(per_s=490, life_s=0.012, spread_db=2.5)


def ring_bank(hz, level_db, t60, size, spot_db):
    """One ring per landing: the spot weights the modes anew, and each ear gets its own phases."""
    count = len(LANDINGS)
    tilt_db = np.array(LANDINGS)[:, 4, None, None]
    chance = rng.standard_normal((count, 5, len(hz)))
    gain = from_db(level_db + spot_db * chance[:, :2] + tilt_db * np.log2(hz / np.median(hz)))
    gain *= from_db(at_hz(WALL_BEAM, hz) * [[.5], [-.5]])
    gain /= np.sqrt((gain ** 2).sum(2).mean(1) / 2)[:, None, None]
    # less alike ears get phases further apart
    apart = np.sqrt(-np.log(np.clip(at_hz(CLOSE_LIKENESS, hz), .01, 1)))
    phase = 2 * np.pi * chance[:, 2:3] + apart * chance[:, 3:]
    # every ring is a weighted sum of the same fading sines and cosines
    t = TIME[:size].astype(np.float32)
    turn = np.outer(np.float32(2 * np.pi * hz), t)
    decay = np.exp(np.outer(np.float32(-np.log(1000) / t60), t))
    waves = np.vstack([np.sin(turn) * decay, np.cos(turn) * decay])
    weights = np.float32(np.concatenate([gain * np.cos(phase), gain * np.sin(phase)], axis=2))
    return (weights.reshape(2 * count, -1) @ waves).reshape(count, 2, size)


def clangs():
    """The struck wall rings in clear modes, a crowd of weaker ones and the rim's faint afterglow."""
    out = np.zeros((2, N))
    clear = ring_bank(*np.transpose(CLEAR_MODES), size=SR, spot_db=4.5) * swell(SR, rise_s=0.0015)
    crowd_hz = np.linspace(700, 7500, 200) + rng.uniform(-17, 17, 200)
    crowd_size = SR // 3
    crowd = ring_bank(crowd_hz, at_hz(CROWD_LEVEL, crowd_hz), at_hz(CROWD_RING, crowd_hz), crowd_size, spot_db=4.0)
    # the struck spot is loudest before the vibration spreads
    contact = 1 + from_db(-4.0) * np.exp(-TIME[:crowd_size] / 0.013)
    crowd = crowd * swell(crowd_size, rise_s=0.0022) * contact
    rim_hz = np.geomspace(1000, 3600, 64) * rng.uniform(.99, 1.01, 64)
    rim = ring_bank(rim_hz, at_hz(RIM_LEVEL, rim_hz), np.full(len(rim_hz), RIM_T60_S), size=SR, spot_db=3.5)
    rim = rim * swell(SR, rise_s=0.006)
    for k, (s, _, _, clang_db, _, _) in enumerate(LANDINGS):
        _, _, _, _, _, damping, rim_db = handful_at(s)
        lost_db = damping * TIME[:SR]
        add(out, s, from_db(clang_db - 7.0 - lost_db) * clear[k], WALL_LEFT_DB)
        add(out, s, from_db(clang_db - 2.5) * crowd[k], WALL_LEFT_DB)
        add(out, s, from_db(clang_db + rim_db - RIM_DAMPED * lost_db) * rim[k], WALL_LEFT_DB)
    return out


def pan():
    """Every landing thuds, booms, clangs and crackles, its hops only thud; other nuts thud, roll and skitter."""
    landings = thuds() + booms_and_crackles() + clangs()
    loose = skitters() + rolls(rise_s=.002, wobble=0.32, rough=0.13)
    return landings + loose + singing(apart=0.52, waver=1 / 4)


def scene():
    """Background of quiet air, a faint even buzz and the plants, a little to the left; the pan close by."""
    background = quiet_air() + buzz(BUZZ_S, level_db=-76.5, low_hz=1110) + plants()
    left_db = 1.37   # added at the left, taken away at the right
    near = knocks() + pan()
    return background * from_db([[left_db], [-left_db]]) + near


def record(dry):
    """The tallest peaks are rounded and the top of the treble is cut."""
    rounded = dry / (1 + (dry / .95) ** 8) ** (1 / 8)
    return signal.sosfilt(signal.ellip(10, .1, 90, CUTOFF_HZ, fs=SR, output="sos"), rounded)


dry = scene()
out = record(dry)
wrap_up_sound(out)
```